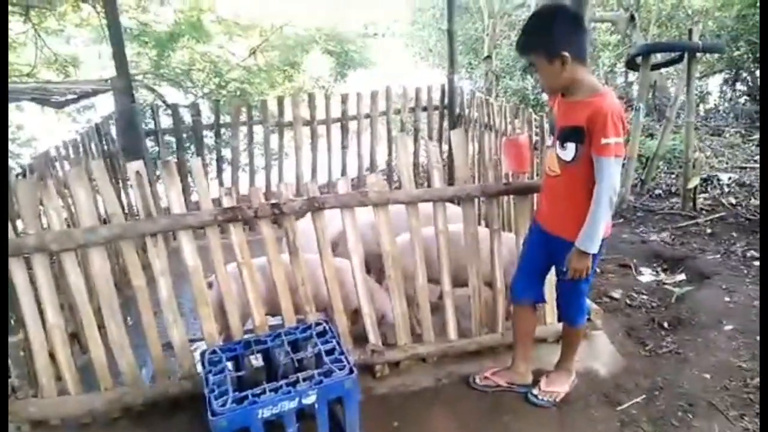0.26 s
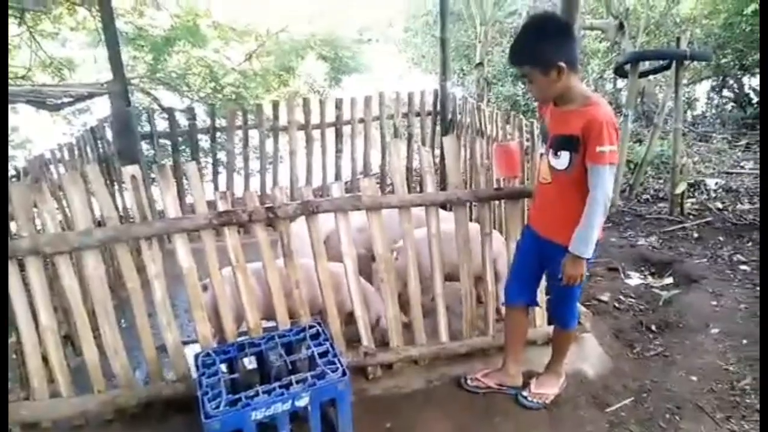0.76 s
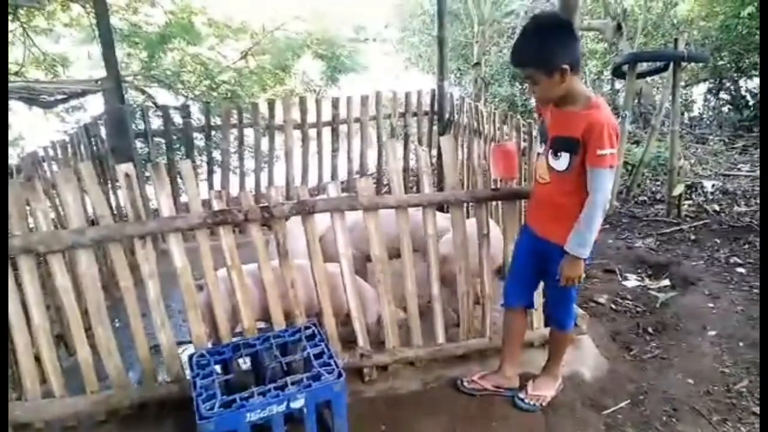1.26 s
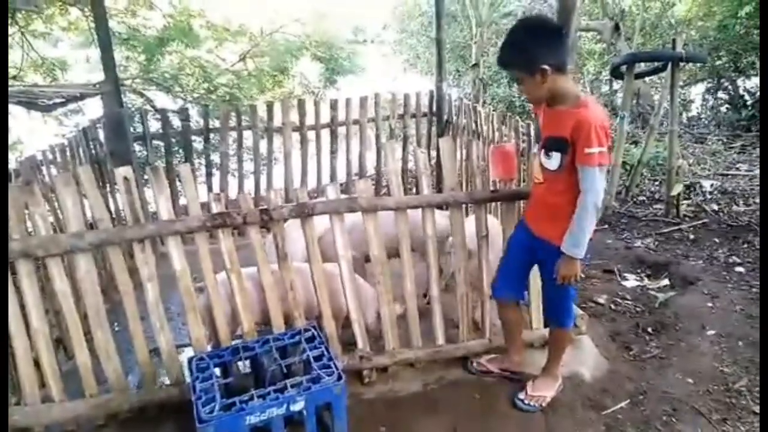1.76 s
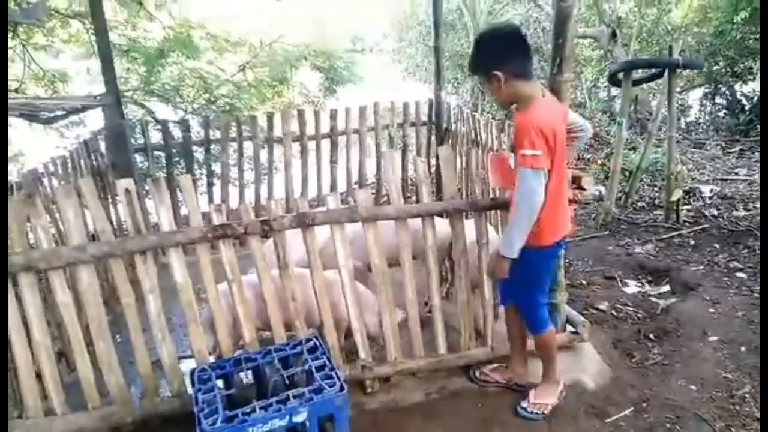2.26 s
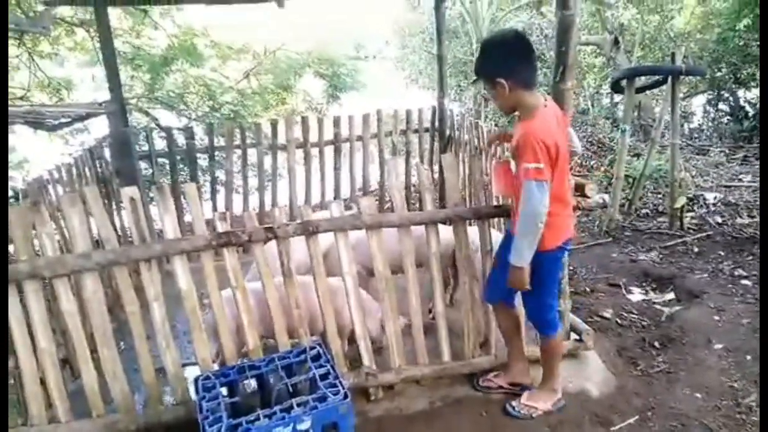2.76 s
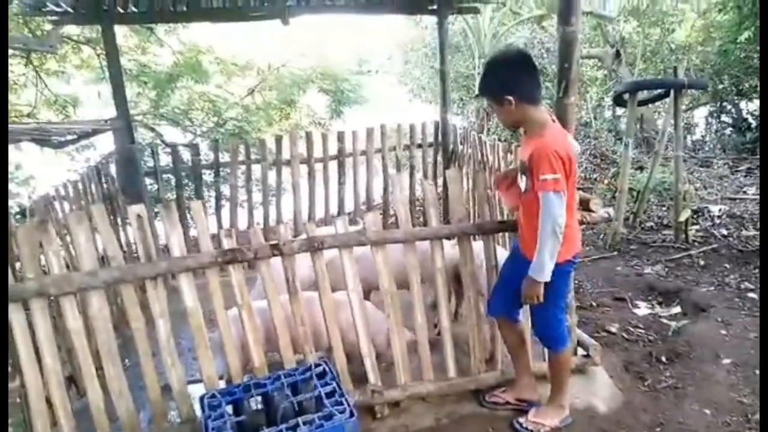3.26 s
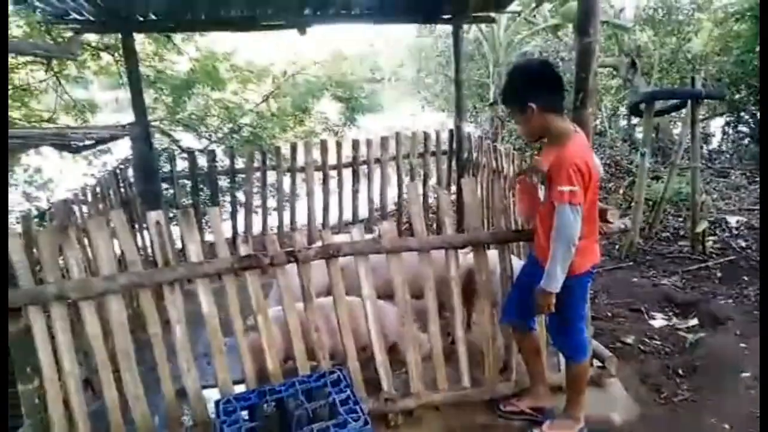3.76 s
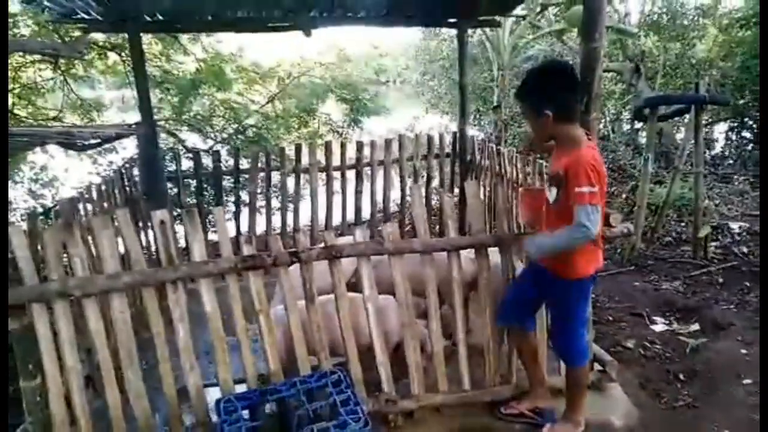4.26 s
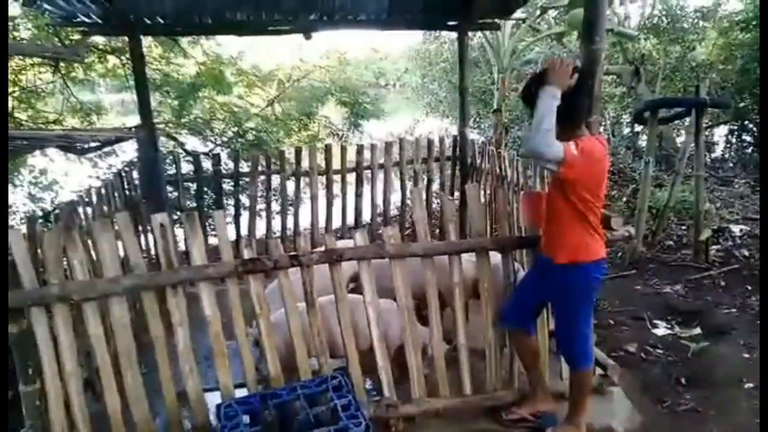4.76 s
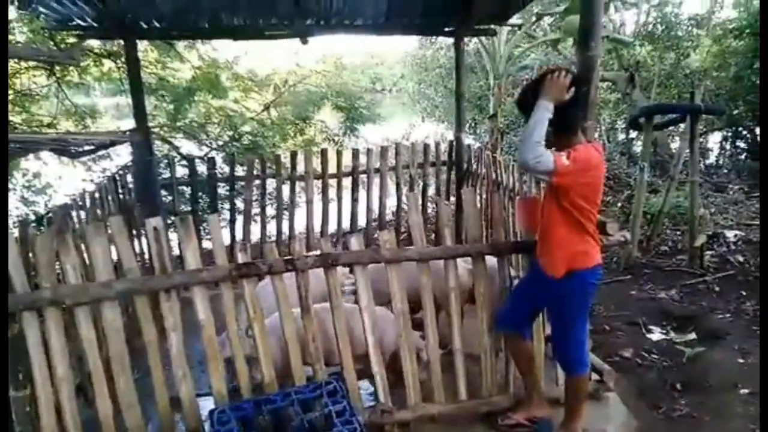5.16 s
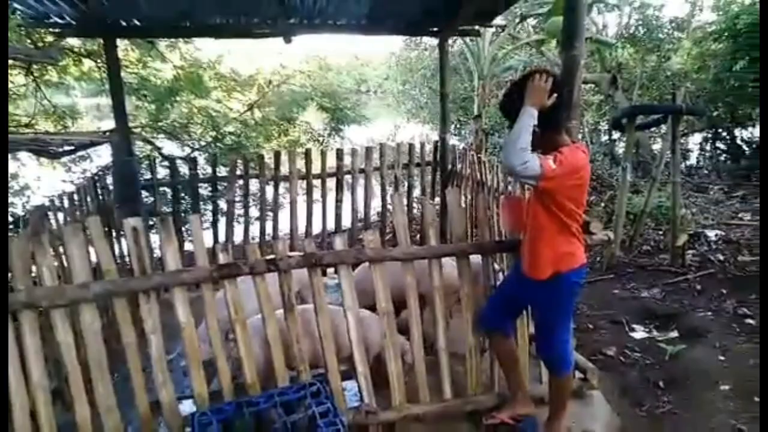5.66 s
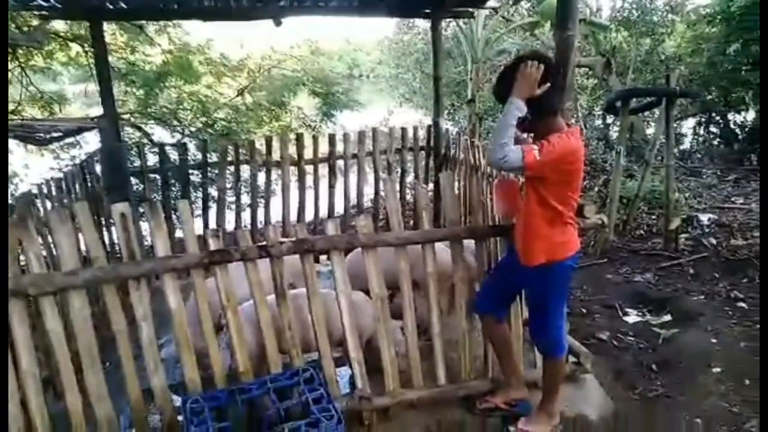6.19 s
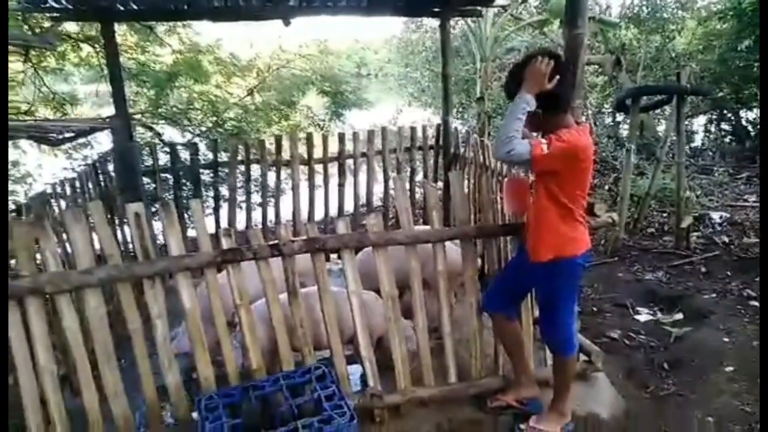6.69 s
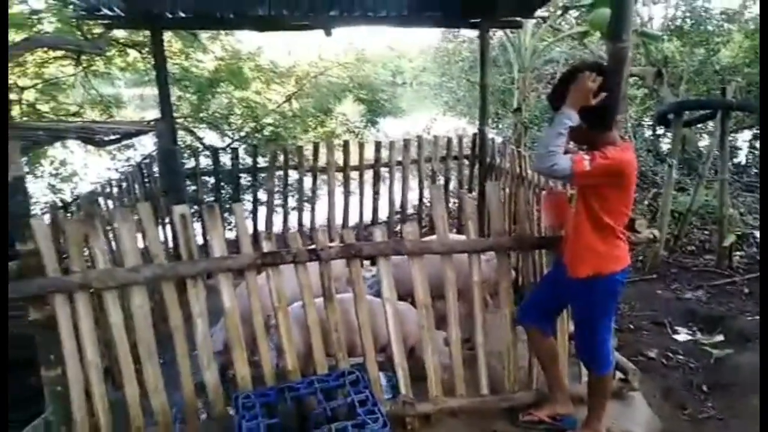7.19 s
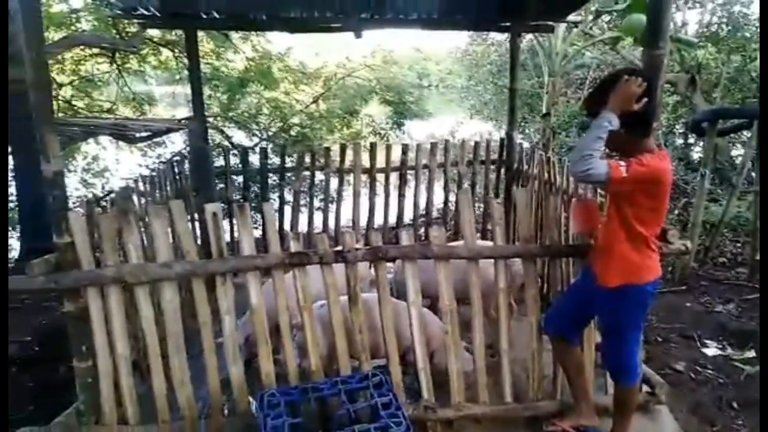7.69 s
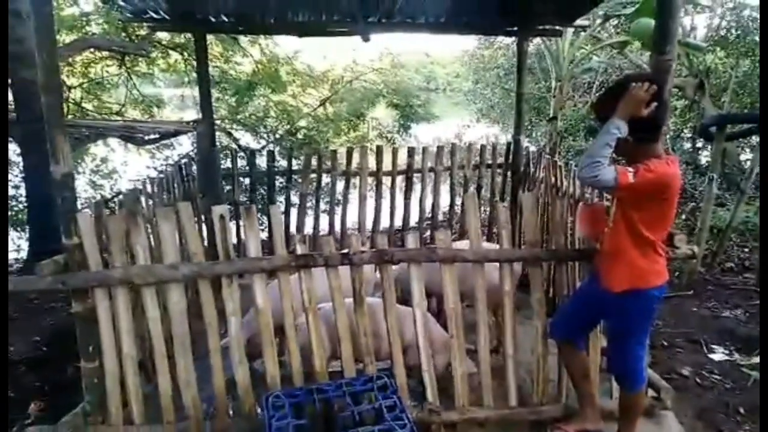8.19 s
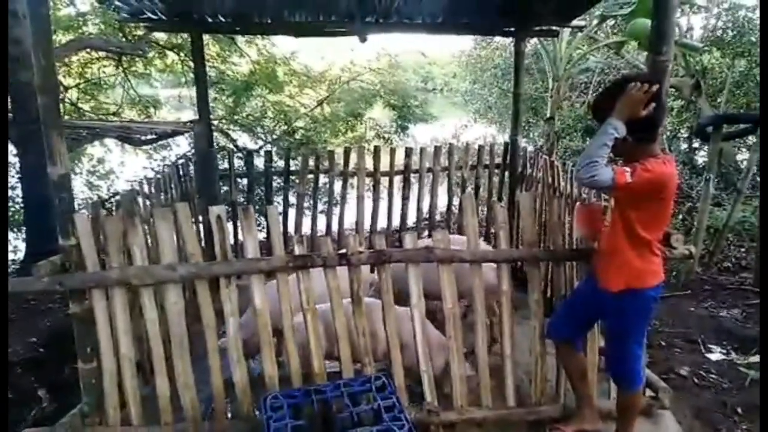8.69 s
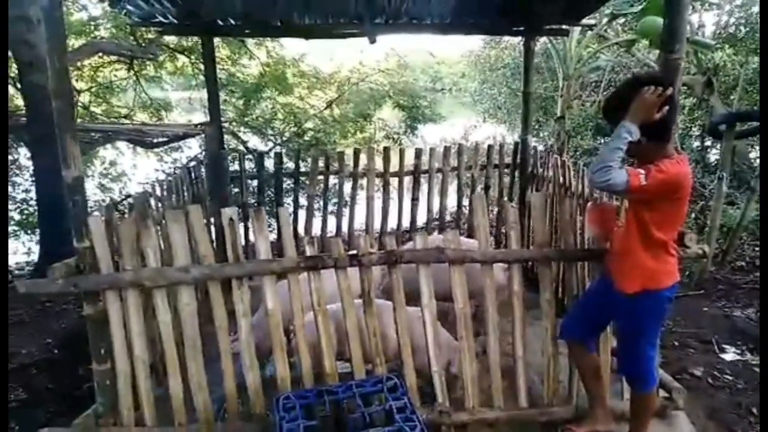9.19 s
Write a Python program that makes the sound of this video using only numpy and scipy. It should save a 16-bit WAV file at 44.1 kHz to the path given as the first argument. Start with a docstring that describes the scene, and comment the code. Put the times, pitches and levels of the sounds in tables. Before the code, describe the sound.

Wet pig sniffing and small throaty grunts, sharp clicks, nearby chick cheeps and distant rooster crows over a low steady rumble and leafy hiss.

```python
"""Pigs snuffle, smack and give short grunts in a slatted pen under a roof, a few metres from a phone.
Chicks cheep close by, birds whistle in the trees, roosters crow far off, and a low rumble with a passing
engine note lies under it all. Breath is shaped noise, grunts and smacks are bursts through resonances,
bird calls are gliding tones or bands of noise. The phone has two spaced ports and a noise suppressor."""
import sys
import numpy as np
from scipy import signal
from scipy.io import wavfile
from scipy.ndimage import uniform_filter1d

SR = 44100
rng = np.random.default_rng(int(sys.argv[2]) if len(sys.argv) > 2 else 0)


def digitize_waveform(pressure):
    """Quantize a signal to 16-bit integers and store it at the path in sys.argv[1].

    Rows of a 2-D input are taken as channels; values are limited to [-1, 1].
    """
    field = np.atleast_2d(pressure).T
    bounded = np.clip(field, -1, 1)
    quanta = np.round(bounded * 32767).astype(np.int16)
    wavfile.write(sys.argv[1], SR, quanta)


def volts_from_decibels(level):
    """Turn decibel levels (scalar or array-like) into linear amplitude factors."""
    exponent = np.asarray(level, float) / 20
    return 10 ** exponent


N = 416304


def evened(x):
    """Scales to rms 1."""
    return x / np.sqrt(np.mean(x ** 2) + 1e-20)


def read(points, hz):
    """Reads a spectrum on a log-frequency axis."""
    f, value = np.transpose(points)
    return np.interp(np.log(hz + 1), np.log(f + 1), value)


def add(mix, s, sound, lag=0):
    """Mixes a sound into both ports, the left one lag samples late (the right one if lag is negative)."""
    for port, late in zip(mix, (max(lag, 0), max(-lag, 0))):
        part = port[round(s * SR) + int(late):][:len(sound)]
        part += sound[:len(part)]


def resonate(x, hz, width):
    """Shifts hz down to zero, smooths twice and shifts back: a steep resonance."""
    turn = np.exp(2j * np.pi * np.cumsum(hz * np.ones(x.shape[-1])) / SR)
    r = np.exp(-np.pi * width / SR)
    smooth = signal.lfilter([(1 - r) ** 2], [1, -2 * r, r * r], x / turn)
    return 2 * (turn * smooth).real


def wander(length, span):
    """Slow chance of rms 1, smooth over span samples."""
    chance = rng.standard_normal(length + 2 * span)
    slow = uniform_filter1d(uniform_filter1d(chance, span), span)
    return evened(slow)[span:-span]


def noise(shape, same, patchy_db, size=512):
    """Two-port noise from random short-time spectra with drifting patches; same is the ports' likeness."""
    hz = np.fft.rfftfreq(size, 1 / SR)
    a, b, c, d, patches = rng.standard_normal((4 * N // size + 5, len(hz), 5), dtype=np.float32).T
    patches = evened(uniform_filter1d(uniform_filter1d(patches, size=4, axis=0), size=24, axis=1))
    same = np.clip(same, -1, 1)
    left = a + 1j * b
    right = same * left + np.sqrt(1 - same ** 2) * (c + 1j * d)
    z = np.array([left, right]) * volts_from_decibels(read(shape, hz)[:, None] + patchy_db * patches)
    return evened(signal.istft(z, nperseg=size, noverlap=3 * size // 4)[1][:, :N])


def echoes(x, t60, first_s):
    """Sparse taps of random sign dying away, other taps for each port."""
    at = np.arange(round(first_s * SR), SR // 2, 20)
    taps = np.zeros((2, SR // 2 + 20))
    for port in taps:
        place = at + rng.integers(0, 20, len(at))
        port[place] = rng.choice([-1., 1.], len(at)) * volts_from_decibels(-60 * at / SR / t60)
    return signal.fftconvolve(x, taps / np.linalg.norm(taps[0]), axes=1)[:, :N]


def unroll(rows):
    """A table's start time and its columns, sample by sample."""
    s, *columns = np.transpose(rows)
    t = np.arange(s[0], s[-1], 1 / SR)
    return s[0], [np.interp(t, s, c) for c in columns]


def rumble():
    """Low wash nearly alike at both ports, fuzzy notes in it, and an engine's even firing for a while."""
    # wash with notes standing out of it: f/Hz, relative density/dB per Hz
    wash = [(25, -41), (50, -16), (78, -6.5), (89, 2), (98, -6), (107, 2.5), (120, -5), (160, -4),
            (236, -17), (303, -24), (395, -29.5), (467, -51), (700, -42.5), (900, -102)]
    # engine note swelling and fading: t/s, level/dB
    engine = [(5.95, -55.5), (6.5, -48), (7.2, -57), (8.3, -76)]
    # weight of the engine's harmonics: f/Hz, relative level/dB
    body = [(30, -27), (120, 6.5), (250, -0.5), (370, -0.5), (460, -16), (560, -28.5)]
    firing_hz = 40.55
    out = volts_from_decibels(-45.5) * noise(wash, same=0.95, patchy_db=2.0, size=8192)
    s, (db,) = unroll(engine)
    turns = np.cumsum(firing_hz * (1 + 0.0046 * wander(len(db), span=4000))) / SR
    firing = np.zeros(len(db))
    for k in range(2, 14):
        level_db = read(body, k * firing_hz) + 2.0 * wander(len(db), span=4000)
        # distance scatters the phases, so the beats are blunt
        phase = 1.26 * rng.standard_normal()
        firing += volts_from_decibels(level_db) * np.cos(2 * np.pi * k * turns + phase)
    add(out, s, volts_from_decibels(db) * evened(firing) * signal.windows.tukey(len(db), .1), -11)
    return out


def leaves_and_insects():
    """A patchy bed of noise, almost independent at the two ports."""
    # colour of the bed: f/Hz, relative density/dB per Hz
    colour = [(350, -8.5), (800, -8), (1990, -13.5), (3440, -3.5), (5570, -8), (6770, -2), (7810, -16.5),
              (11700, -34.5), (13500, -42)]
    return volts_from_decibels(-60) * noise(colour, same=0.033, patchy_db=9, size=1024)


def blurred_calls():
    """Far birds whose notes arrive through the leaves as gliding bands of noise."""
    # calls: start t/s, end t/s, first f/Hz, last f/Hz, level/dB
    calls = [(6.547, 7.024, 3250, 3050, -62), (7.058, 7.22, 5420, 5300, -61),
             (8.017, 8.16, 4030, 3990, -65), (8.149, 8.455, 2620, 2430, -67),
             (8.19, 8.537, 3440, 3220, -71)]
    out = np.zeros((2, N))
    for start, end, first, last, db in calls:
        s, (hz,) = unroll([(start, first), (end, last)])
        band = evened(resonate(rng.standard_normal(len(hz)), hz, 260))
        level = volts_from_decibels(db + 2.6 * wander(len(hz), span=700))
        add(out, s, level * band * signal.windows.tukey(len(hz), .3), 11)
    return out


def roosters():
    """Each multiple of the pitch is part clear tone, part hoarse noise around it."""
    # crow notes: start t/s, length/s, first f/Hz, last f/Hz, effort/dB (relative level at the first pitch)
    crows = [(0.38, 0.39, 657, 713.5, -66), (0.437, 0.18, 791, 793, -60), (0.599, 0.12, 795, 841, -58.5),
             (0.723, 0.78, 813, 779, -55.5), (1.574, 0.73, 664, 550.3, -54), (3.198, 0.31, 845, 850, -79.5),
             (3.474, 0.51, 1019, 947, -65.5), (4.219, 0.22, 883, 816, -78.5), (4.779, 0.32, 830, 873, -78),
             (5.197, 0.59, 886, 793, -75.5), (8.949, 0.49, 893, 904, -73)]
    # partials: multiple of the pitch, relative level/dB; 2.552 is a second, hoarse oscillation
    orders = [(1, 5), (2, 9), (2.552, -3.5), (3.002, -5.5)]
    # throat colour: f/Hz, relative level/dB
    throat = [(650, -2.5), (810, 0.5), (900, -4), (1300, -3.5), (1650, 1.5), (2300, -1)]
    out = np.zeros((2, N))
    for s, length, first_hz, last_hz, effort_db in crows:
        u = np.arange(0, length, 1 / SR) / length
        hz = first_hz + (last_hz - first_hz) * u
        # level and pitch both follow the effort: 62.5 dB per octave
        db = effort_db + 62.5 * np.log2(hz / first_hz)
        # share of hoarse noise; fainter, farther birds are more blurred
        rough = np.clip(.47 + .008 * (-55 - effort_db), 0, 1)
        hz = hz * (1 + 0.009 * wander(len(hz), span=500))
        turns, breath = np.cumsum(hz) / SR, rng.standard_normal(len(hz))
        voice = np.zeros(len(hz))
        for k, order_db in orders:
            tone = np.sqrt(2) * np.cos(2 * np.pi * k * turns)
            hoarse = evened(resonate(breath, k * hz, 80 * k))
            voice += volts_from_decibels(order_db + read(throat, k * hz)) * ((1 - rough) * tone + rough * hoarse)
        level = volts_from_decibels(db + 2.58 * wander(len(hz), span=900))
        add(out, s, voice * level * signal.windows.tukey(len(hz), .08), -19)
    return out + volts_from_decibels(-2) * echoes(out, .35, .01)


def note(rows, flutter_db, wobble):
    """A bird's near-sine on a rounded pitch curve, its level fluttering."""
    s, (hz, db) = unroll(rows)
    hz = uniform_filter1d(hz, size=200, mode="nearest") * (1 + wobble * wander(len(hz), span=60))
    db = db + flutter_db * wander(len(hz), span=150)
    tone = np.sqrt(2) * np.sin(2 * np.pi * np.cumsum(hz) / SR)
    return s, tone * volts_from_decibels(db) * signal.windows.tukey(len(hz), .08)


def birds():
    """Gliding cheeps near the pen with its reflections; held whistles with a longer echo from the trees."""
    # one curve per cheep, direct sound: t/s, f/Hz, level/dB
    cheeps = [
        [(.02, 3260, -47), (.046, 2810, -41.5), (.071, 2560, -38)],
        [(.14, 4870, -51), (.178, 4720, -49), (.19, 4000, -60), (.215, 3660, -42), (.235, 3130, -57),
         (.245, 2720, -33), (.263, 2200, -39)],
        [(.395, 4020, -55), (.448, 3670, -53), (.49, 2800, -60)],
        [(.6, 4310, -54), (.65, 3960, -54.5), (.69, 3180, -48)],
        [(.79, 4250, -52), (.86, 3300, -55)],
        [(.99, 3420, -40), (1.004, 3510, -40), (1.01, 4400, -36), (1.03, 4590, -33), (1.062, 3910, -42),
         (1.09, 3410, -31), (1.12, 3050, -42.5), (1.138, 2300, -38)],
        [(1.15, 4320, -47), (1.2, 3300, -53)],
        [(1.29, 4590, -40), (1.33, 4250, -50), (1.36, 3620, -35.5), (1.39, 3130, -41.5), (1.415, 2080, -38)],
        [(1.66, 4110, -51), (1.71, 2900, -53.5)],
        [(2.3, 4660, -60), (2.322, 3970, -35), (2.36, 3430, -40), (2.39, 3230, -44), (2.43, 2800, -44)],
        [(2.507, 4630, -48), (2.545, 4410, -54.5), (2.577, 3580, -37), (2.606, 3100, -46), (2.626, 2640, -37),
         (2.646, 2210, -38)],
        [(3.59, 5060, -55), (3.605, 4770, -53), (3.632, 3960, -52), (3.648, 3900, -44), (3.686, 3230, -42.5),
         (3.721, 2850, -36), (3.737, 2620, -40)],
        [(3.88, 4900, -48), (3.9, 4290, -46), (3.95, 3460, -35.5), (3.994, 2740, -36), (4.021, 2280, -52)],
        [(4.83, 3460, -46), (4.842, 4750, -49), (4.875, 4130, -48), (4.91, 3600, -33.5), (4.938, 3330, -39),
         (4.966, 2460, -40)],
        [(6.272, 2810, -65), (6.281, 2800, -38.5), (6.297, 2160, -43), (6.31, 2060, -53)],
        [(6.32, 2330, -38), (6.33, 2970, -47), (6.338, 3600, -50)],
        [(6.44, 4350, -55), (6.462, 3600, -44.5), (6.485, 3220, -37.5), (6.503, 2500, -42.5)],
        [(7.264, 2880, -50), (7.277, 4100, -51), (7.295, 4450, -45), (7.332, 3700, -41), (7.37, 2890, -51),
         (7.39, 2280, -58)],
        [(7.462, 3280, -46), (7.473, 4300, -55), (7.485, 4670, -47.5), (7.51, 3960, -48.5), (7.535, 3690, -36),
         (7.566, 2840, -49)],
        [(8.806, 4320, -60), (8.87, 3870, -55.5)],
    ]
    # where the cheeps come from over time: t/s, delay at the left port/samples
    path = [(.2, 10), (.4, 13), (.85, 13), (1, 4), (1.7, 4), (2.3, 10), (5, 10), (6.2, 14.0)]
    # held whistles: start t/s, end t/s, first f/Hz, last f/Hz, level/dB ahead of port balance and echo
    whistles = [(2.94, 3.349, 4710, 4340, -63.5), (3.383, 3.587, 3743, 3790, -58.5),
                (4.413, 4.76, 4344, 4290, -59), (5.084, 5.533, 3914, 3886, -63.5),
                (5.592, 6.208, 3603, 3519, -60.5), (7.591, 7.993, 4070, 3995, -66.5),
                (7.565, 7.869, 5050, 5260, -64), (7.597, 7.875, 6107, 6110, -62.5)]
    near, far = np.zeros((2, 2, N))
    for rows in cheeps:
        lag = round(np.interp(rows[0][0], *np.transpose(path)))
        add(near, *note(rows, 1.5, .006), lag)
    for start, end, first, last, db in whistles:
        add(far, *note([(start, first, db), (end, last, db)], 3.0, 0.0058), 11)
    trees = volts_from_decibels(-4) * echoes(far, .35, .006)
    pen = volts_from_decibels(-5) * echoes(near, 0.03, 0.0005) + volts_from_decibels(-13) * echoes(near, 0.15, 0.004)
    return near + pen + far * volts_from_decibels([[1.5], [-1.5]]) + trees


def smacks():
    """Lip smacks and hoof clicks on the slab: sharp crackle through broad modes, some ringing more."""
    # events: t/s, direct peak/dB, favoured f/Hz, crackle t60/s
    events = [(1.819, -30.5, 8000, 0.033), (1.823, -23, 3000, 0.016), (2.125, -35.5, 2200, 0.03),
              (2.2206, -32, 6500, 0.023), (2.682, -41, 1240, 0.029), (2.683, -39, 7350, 0.075),
              (3.068, -34, 4470, 0.044), (3.81, -37.5, 5760, 0.039), (5.7305, -28, 4000, 0.045),
              (7.282, -46, 2520, 0.16), (8.561, -37, 1910, 0.19), (9.305, -33, 1190, 0.043)]
    # modes: f/Hz, width/Hz, relative level/dB
    modes = [(1300, 260, 1), (1900, 500, 1), (2700, 900, 3), (4380, 1400, 6.5), (6470, 1400, 2),
             (8800, 1600, -4)]
    out = np.zeros((2, N))
    t = np.arange(3000) / SR
    for s, db, favoured_hz, t60 in events:
        crackle = rng.standard_normal((2, 3000))
        uneven = np.exp(1.2 * evened(uniform_filter1d(crackle[1], size=30)))
        burst = crackle[0] * uneven * volts_from_decibels(-60 * t / max(t60, .01))
        ring = np.zeros(3000)
        for hz, width, mode_db in modes:
            # 10 dB lost one octave away from the favoured pitch
            gain = volts_from_decibels(mode_db - 10 * np.log2(hz / favoured_hz) ** 2)
            ring += gain * resonate(burst, hz, width) / np.sqrt(width)
        add(out, s, volts_from_decibels(db) * ring / abs(ring).max(), 1)
    return out + volts_from_decibels(-4) * echoes(out, 0.3, 0.0034)


def sniffs():
    """Faint extra puffs at uneven beats, about one a beat, each of chance place, strength and length."""
    gap_s = .14
    beats = np.arange(0, N / SR - gap_s, gap_s)
    place, size, long = rng.uniform(-1.15, 1, (len(beats), 3)).T
    start_s = beats + gap_s * (1 + place) / 2
    # same columns as the puffs in snuffles()
    return np.transpose([start_s, -57 + 5 * size, 0.059 * 2 ** long, -9.5 + 0 * beats])


def snuffles():
    """Puffs rise and fade: hiss in the nostrils, duller rush in the snout, thin spray, all sputtering wetly."""
    # clear puffs through the snouts: t/s, relative level/dB, length/s, snout rush against the hiss/dB
    puffs = [(0.0094, -41, 0.043, -6), (0.483, -42.5, 0.064, -13), (0.664, -48.5, 0.38, 5),
             (1.1586, -47, 0.11, 7), (1.438, -42, 0.077, -0.5), (1.557, -40.5, 0.077, -3.5),
             (1.803, -37, 0.065, -4), (1.932, -43.5, 0.072, -67), (2.26, -43.5, 0.35, -43),
             (2.41, -37.5, 0.1, -26), (2.675, -44.5, 0.046, 1.5), (2.963, -58, 0.018, 17.5),
             (3.048, -43.5, 0.067, -10), (3.36, -46, 0.024, -34), (3.45, -55, 0.029, 13),
             (3.628, -40.5, 0.033, -33), (4.045, -41, 0.053, 1.5), (4.198, -38, 0.028, -12),
             (4.563, -50, 0.043, -12), (4.733, -46, 0.15, -11.5), (4.978, -39, 0.03, 5),
             (5.163, -47, 0.058, -38), (5.42, -52.5, 0.037, -23), (5.733, -37.5, 0.03, -7.5),
             (5.921, -50.5, 0.052, 4), (6.22, -49, 0.071, 7.5), (6.445, -42.5, 0.086, -25),
             (7.273, -58.5, 0.045, 14.5), (7.5234, -37, 0.047, -32), (8.176, -46.5, 0.023, -38),
             (8.208, -51.5, 0.094, 4), (8.54, -37, 0.065, -1), (8.935, -49.5, 0.1, -2),
             (9.08, -46.5, 0.017, -37), (9.248, -48, 0.089, 2), (9.403, -36, 0.048, -15)]
    # colours of the nostril hiss, the snout rush and the thin top of hard puffs:
    # f/Hz, relative density/dB per Hz
    nostrils = [(500, -63), (1500, -17), (3000, 0.5), (4500, 0), (7000, -2), (10000, -12), (13000, -36)]
    snout = [(300, -23), (700, -13), (1300, -2.5), (2400, 5.5), (3500, -4.5), (6000, -43)]
    top = [(5000, -25), (7500, 5), (10000, -1), (13200, -7)]
    flow, t = np.zeros((3, N)), np.arange(SR // 2) / SR
    for s, db, length, snout_db in [*puffs, *sniffs()]:
        length = max(length, .01)
        # long puffs rise more gently
        shape = (1 - np.exp(-t / (0.12 * length))) * np.exp(-(t / length) ** 0.9)
        # the spray grows faster than the hiss
        spray_db = db - 8 + .7 * (db + 38)
        start = max(round(s * SR), 0)
        puff = volts_from_decibels([[db], [db + snout_db], [spray_db]]) * shape
        flow[:, start:start + len(t)] += puff[:, :N - start]
    sputter = volts_from_decibels(2.6 * wander(N, span=120) + 2.0 * wander(N, span=900))
    hiss = noise(nostrils, same=0.15, patchy_db=4.5)
    rush = noise(snout, same=0.13, patchy_db=4)
    spray = noise(top, same=.1, patchy_db=5)
    return volts_from_decibels(-7.0) * sputter * (flow[0] * hiss + flow[1] * rush + flow[2] * spray)


def grunts():
    """A few uneven throat pulses, about 125 a second, ring a snout whose resonances glide."""
    # short grunts: t/s, direct peak/dB, snout resonance f/Hz, length/s, delay at the left port/samples
    calls = [(0.04, -60, 647, 0.093, -3), (2.96, -47, 500, 0.042, 0), (3.067, -30.5, 525, 0.016, -2),
             (3.143, -44, 535, 0.021, -2), (3.453, -54, 560, 0.16, 9), (3.602, -43, 504, 0.021, 3),
             (4.048, -35, 564, 0.045, 25), (4.272, -41.5, 600, 0.021, 5), (4.36, -53, 555, 0.035, 5),
             (4.527, -52, 588, 0.22, -3), (4.782, -50.5, 307, 0.044, -8), (4.971, -37, 554, 0.059, 19),
             (5.126, -35.5, 564, 0.035, 22), (5.323, -51, 540, 0.029, 3), (5.754, -59, 494, 0.055, 16),
             (5.862, -38, 470, 0.033, 26), (8.012, -61, 676, 0.034, 2), (9.0, -56.5, 555, 0.33, -7),
             (9.153, -57.5, 557, 0.045, 0)]
    out = np.zeros((2, N))
    t = np.arange(6000) / SR
    for s, db, hz, length, lag in calls:
        chance, u = rng.standard_normal((2, 6000)), t / max(length, .005)
        turns = np.cumsum(125 * (1 + 2.82 * uniform_filter1d(chance[0], size=300))) / SR
        breath = .035 * chance[1]
        pulses = np.diff(np.floor(turns), prepend=-1) + breath
        # opens at a quarter of its strength and swells over half its length
        swell = 1 - .75 * np.exp(-(u / .5) ** 2)
        grumble = 0.071 * np.exp(-t / 0.025)  # a weak after-grumble
        pulses *= swell * np.exp(-u ** 4) + grumble
        pulses = signal.lfilter(np.hanning(24), 1, pulses)  # soft folds: no click at the front
        # the pig on the right lifts its snout further, which shortens it; well to the left the pitch sinks
        rise = 0.04 + 0.02 * lag
        hz = hz * (1 + rise * (np.minimum(u, 1.1) - .4))
        voice = resonate(pulses, hz, 147)
        voice += volts_from_decibels(-8.5) * resonate(pulses, 0.693 * hz, 155)
        voice += volts_from_decibels(-17) * resonate(pulses, 1.67 * hz, 550)
        voice += volts_from_decibels(-26.0) * resonate(pulses, 2.75 * hz, 1100)
        add(out, s, volts_from_decibels(db) * voice / abs(voice).max(), lag)
    return out + volts_from_decibels(-9) * echoes(out, 0.3, 0.00489)


def scene():
    """All sources at the two ports."""
    background = rumble() + leaves_and_insects() + blurred_calls() + roosters()
    return background + birds() + smacks() + snuffles() + grunts()


def band_limit(x):
    """A steep low-pass at the top of the band."""
    return signal.sosfilt(signal.butter(12, 13830, fs=SR, output="sos"), x)


def record(dry):
    """The phone: port colour, a suppressor that lowers bins under their usual floor, the band edge."""
    # difference between the ports: f/Hz, left over right/dB
    port_tilt = [(300, -0.2), (660, -1.5), (1200, 0.5), (2190, 0), (3990, 3.5), (7260, 7), (13200, -23.5)]
    hz, _, z = signal.stft(dry, SR, nperseg=1024, noverlap=768)
    power = uniform_filter1d(uniform_filter1d(abs(z) ** 2, size=3, axis=1), size=7, axis=2)
    power_db = 10 * np.log10(power + 1e-16)
    floor_db = np.percentile(power_db[..., ::8], 32, axis=2, keepdims=True)
    # full cut 3 dB under the floor; none below 450 Hz, all of it from 1450 Hz
    depth = np.clip((floor_db - power_db) / 3, 0, 1)
    cut_db = -18 * depth * np.clip(hz / 1000 - .45, 0, 1)[:, None]
    tilt_db = read(port_tilt, hz)[:, None] * np.array([.5, -.5])[:, None, None]
    z = z * volts_from_decibels(cut_db + tilt_db) * (hz < 13250)[:, None]
    mix = signal.istft(z, nperseg=1024, noverlap=768)[1][:, :N]
    return band_limit(mix)


dry = scene()
out = record(dry)
digitize_waveform(out)
```